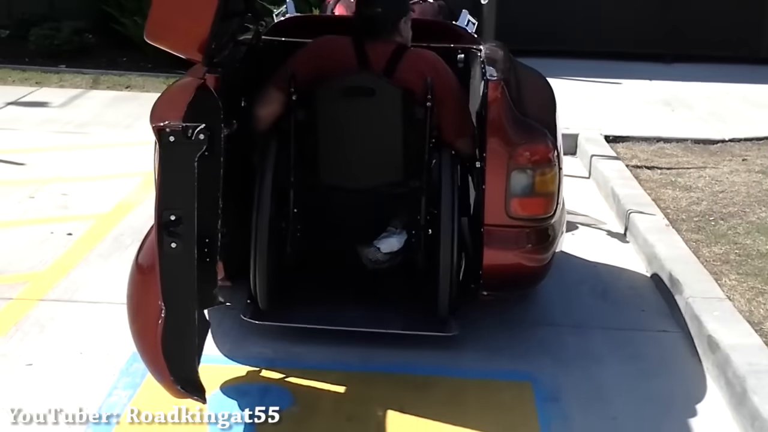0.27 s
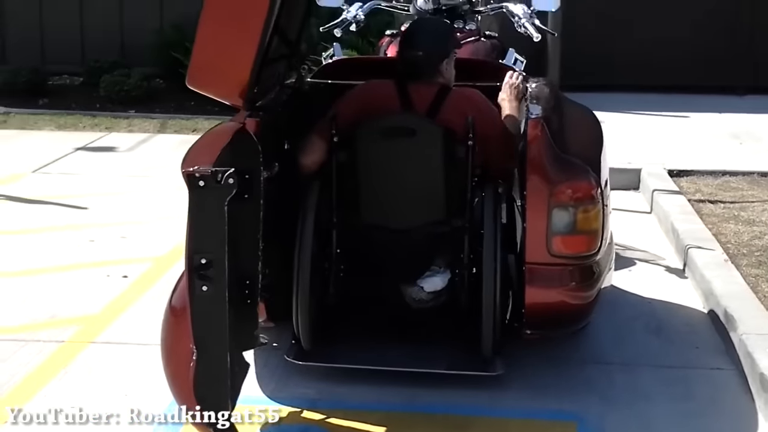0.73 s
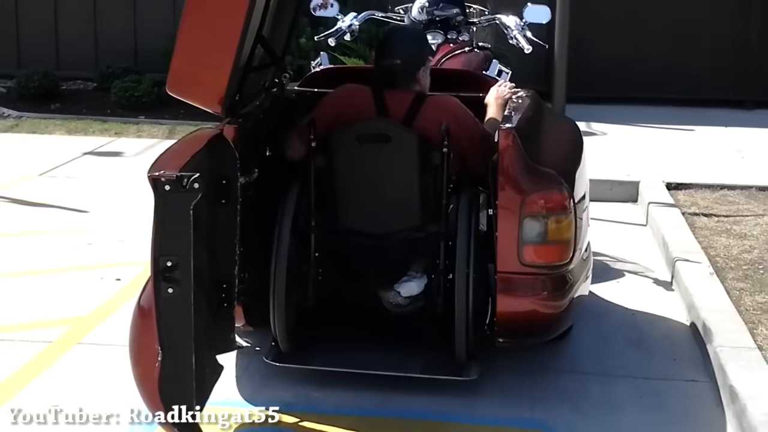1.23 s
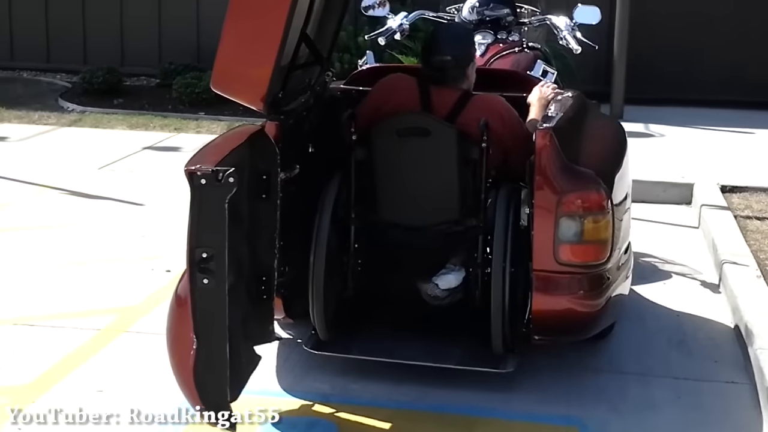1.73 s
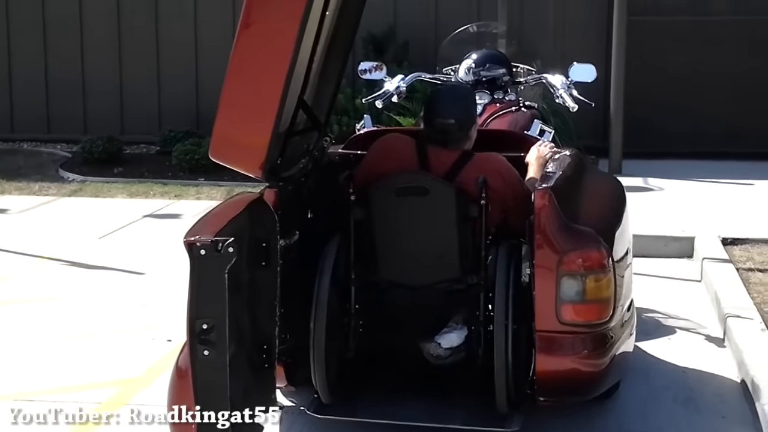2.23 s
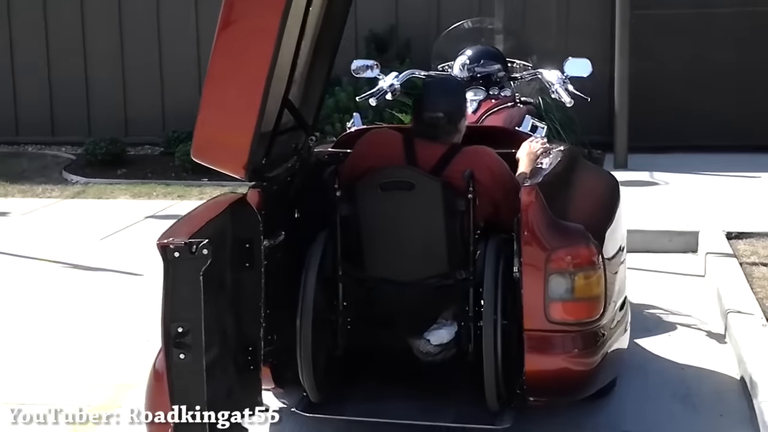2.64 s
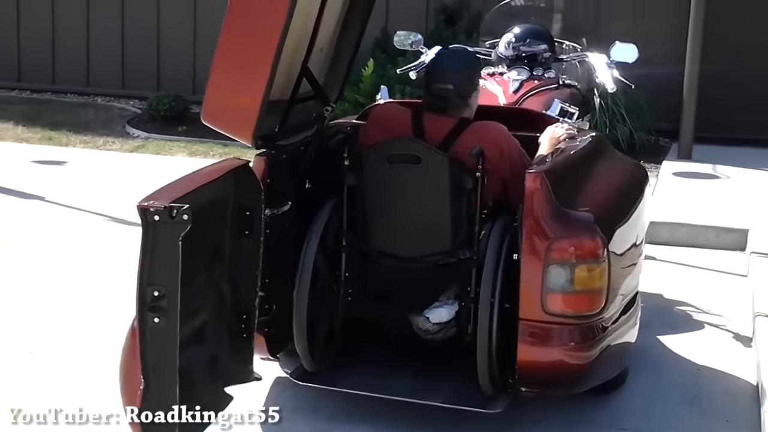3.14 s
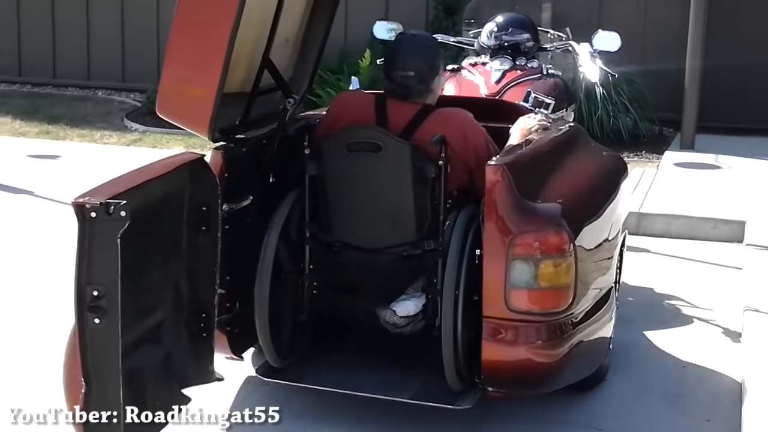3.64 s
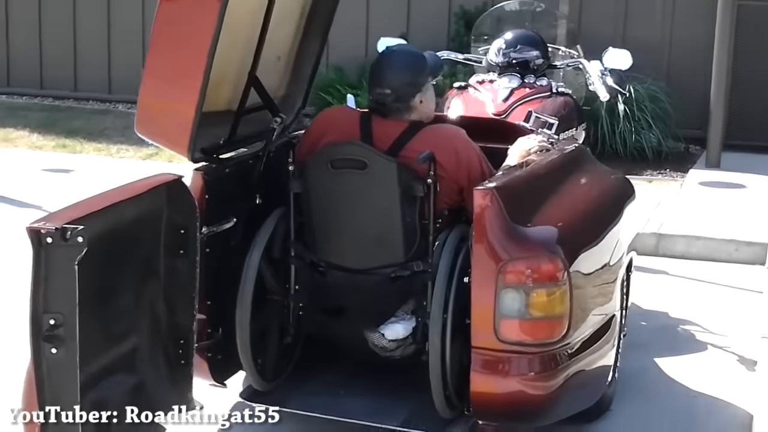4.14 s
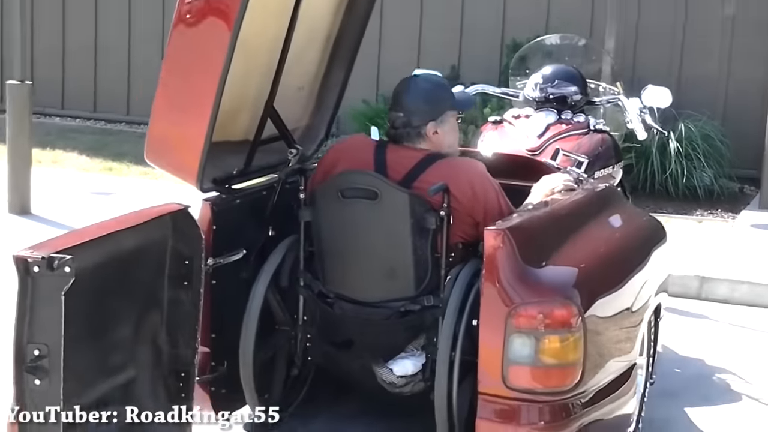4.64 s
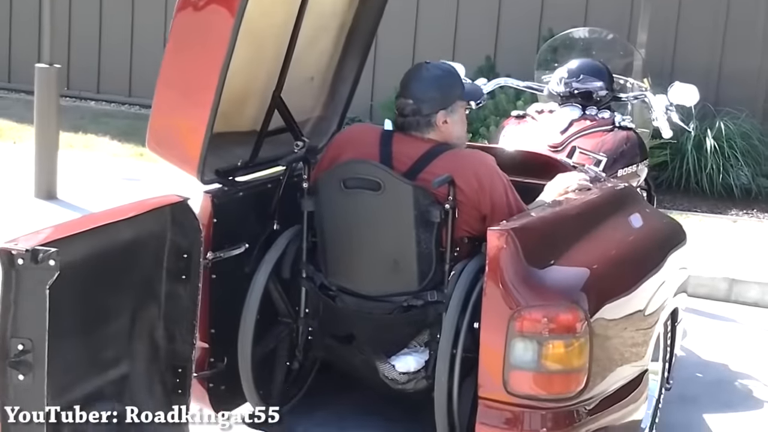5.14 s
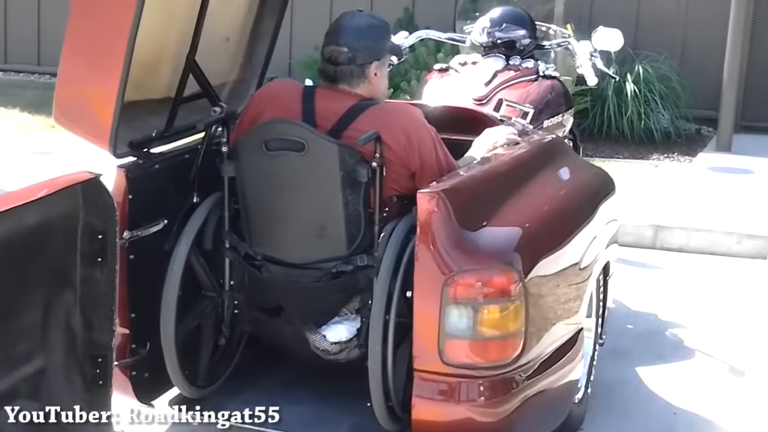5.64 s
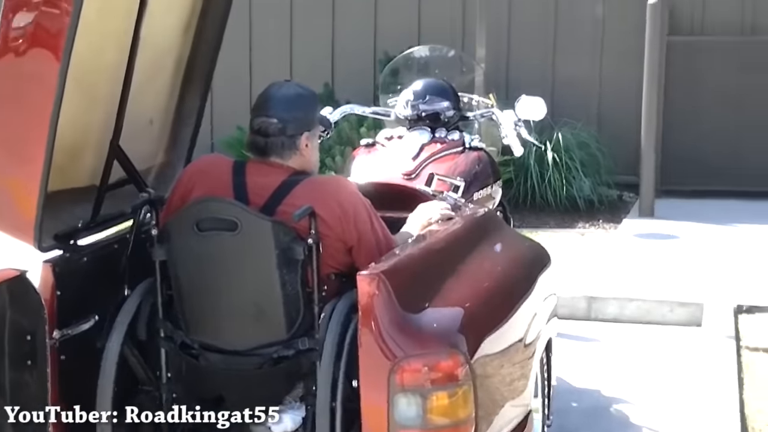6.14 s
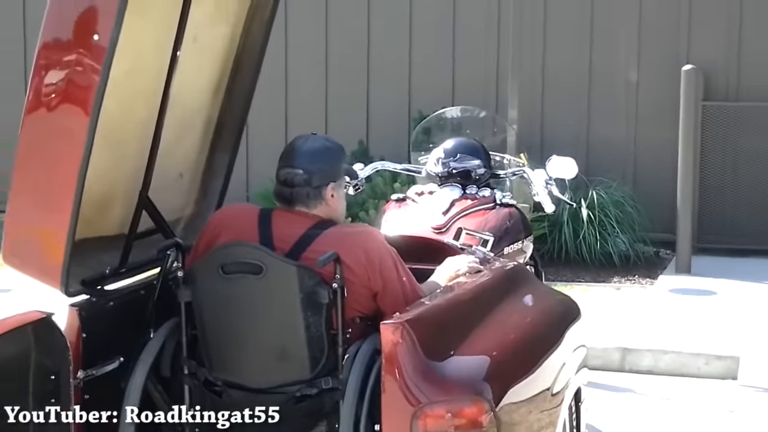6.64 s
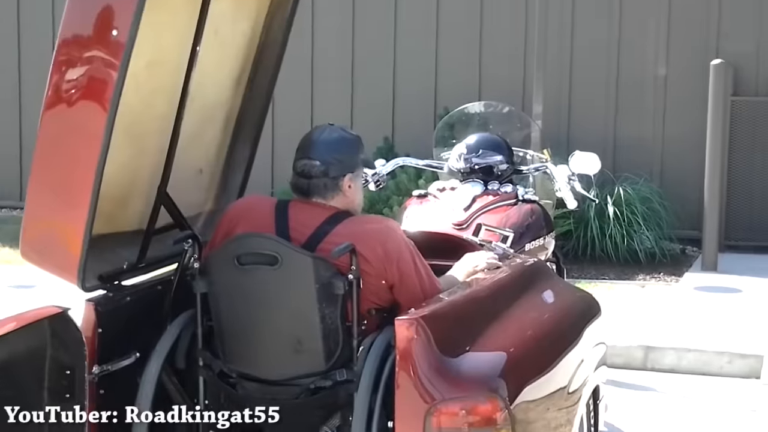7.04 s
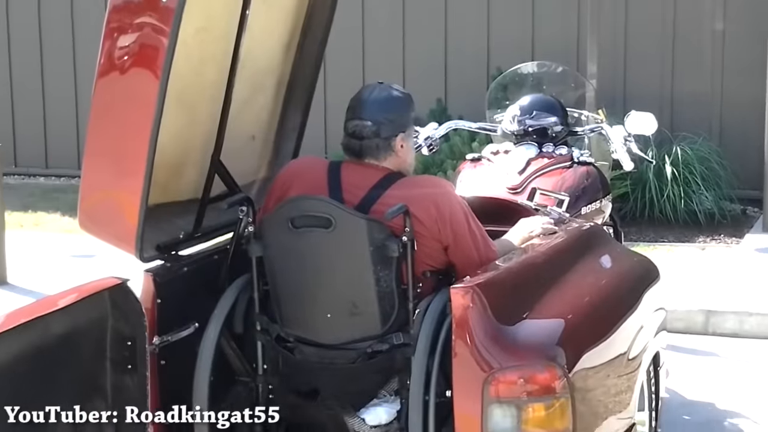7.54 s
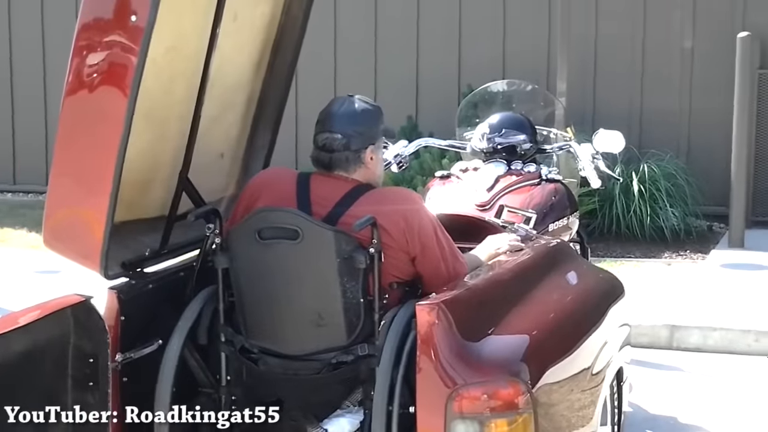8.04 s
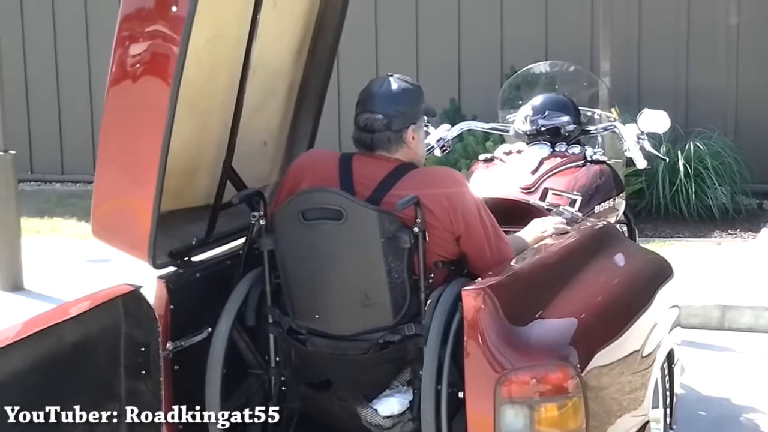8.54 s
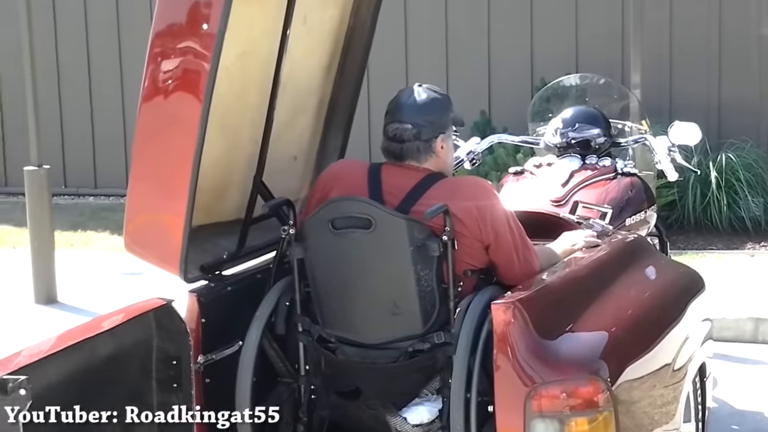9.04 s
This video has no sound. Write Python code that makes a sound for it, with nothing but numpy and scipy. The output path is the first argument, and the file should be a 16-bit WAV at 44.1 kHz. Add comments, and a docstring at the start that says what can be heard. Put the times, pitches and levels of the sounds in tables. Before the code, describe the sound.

Outdoors beside a parked motorcycle with a wheelchair sidecar, heard through a small handheld camera with little bass. At 0 s a short clank dies away; metal latch clicks follow at 0.2, 0.35 and 0.45, with a sharp, strongest one at 0.55 and a dull knock at 0.6. Thin, gliding bird whistles flutter over soft outdoor hum and a distant idling engine until about 1 s. At 0.95 the lift motor starts quickly with a brief growl, masking the background. Its rough, gritty whine near 210 Hz holds almost even, sagging slightly, with whirr, hiss and a rub pulsing about thirteen times a second. The sound grows nearer. Soft camera thumps occur at 1.7, 4.9 and 6.1-6.4; a mechanical jolt at 6.5, a sharp plastic tick at 7.27. Thumps and clicks cluster around 7.5-7.9, 8.4-8.9 and strongest at 9.15-9.25, the motor still running.

```python
"""Electric lift on a parked vehicle

The lift starts after about a second; a 16-tooth pinion sings a rough harmonic stack and rubs once a turn.
Sines on tooth-rate multiples make the whine, filtered noise and recurring grains the whirr, hiss and rub.
Before it: clicks of damped modes, gliding whistles of small birds, outdoor noise and an engine drone that
sink as it starts. More clicks come late; a hand-held camera walks closer, and fingers thump its body."""
import sys
import numpy as np
from scipy import signal
from scipy.fft import rfft, irfft
from scipy.io import wavfile
from scipy.ndimage import uniform_filter1d

SR = 44100
rng = np.random.default_rng(int(sys.argv[2]) if len(sys.argv) > 2 else 0)


def output_pcm(signal):
    """Save a mono or channel-first signal as 16-bit PCM at the path in sys.argv[1].

    Samples are clipped to [-1, 1] before scaling.
    """
    pcm = np.clip(np.atleast_2d(signal).T, -1, 1) * 32767
    wavfile.write(sys.argv[1], SR, np.round(pcm).astype(np.int16))


def undo_db(level):
    """Turn decibels back into plain size, where 20 dB means ten times bigger."""
    steps = np.asarray(level, float) / 20
    return 10 ** steps


N = 410126
T = np.arange(N) / SR


def level(x, db):
    """Scale to an rms level."""
    return x * undo_db(db) / np.sqrt(np.mean(x ** 2))


def coloured(points, source=None):
    """Noise, or another white source, shaped to a (f/Hz, level/dB) spectrum, rms 1."""
    hz, db = np.transpose(points)
    f = np.maximum(np.fft.rfftfreq(N, 1 / SR), 1)
    source = rng.standard_normal(N) if source is None else source
    gain = undo_db(np.interp(np.log(f), np.log(hz), db))
    return level(irfft(rfft(source) * gain, N), 0)


def resonant(modes, source=0):
    """Noise, plus any other source, through (f/Hz, width/Hz, level/dB) resonances, rms 1."""
    out = 0
    for hz, width_hz, db in modes:
        b, a = signal.iirpeak(hz, hz / width_hz, SR)
        once = signal.lfilter(b, a, source + rng.standard_normal(N))
        out = out + level(signal.lfilter(b, a, once), db)  # second pass steepens the skirts
    return level(out, 0)


def walk(rate_hz):
    """Random levels held 1 / rate and slewed twice; spread near 1."""
    k = int(SR / rate_hz)
    held = np.repeat(rng.standard_normal(N // k + 1), k)
    return 1.3 * uniform_filter1d(uniform_filter1d(held, k), k)[:N]


def lobe(db, s, lobe_db, width_s):
    """Level in dB of a part with a Gaussian rise or dip in time, as when walking past a directional source."""
    return db + lobe_db * np.exp(-((T - s) / width_s) ** 2)


def add(out, s, x):
    """Mix x in from time s."""
    i = max(int(s * SR), 0)
    out[i:i + len(x)] += x[:N - i]


START_S, RUN_UP_S = 0.95, 0.11
WHINE_DB, WHIRR_DB, HISS_DB = -32.5, -35, -35.5  # at nearness 0 dB, running free
WHINE_GROWTH, WHIRR_GROWTH = 1.52, 1.17  # dB per dB of nearness
FREE_TURNS_PER_S, LOAD_DB = 12.98, 2  # whine gain per turn/s that the load takes off
# camera walks up to the lift: t/s, nearness/dB
NEARER = [(1., 1), (2.7, 1), (3.4, 1.5), (5.1, 2.5), (6.4, 3), (7.5, 4), (8.5, 3), (8.9, 5), (9.15, 5.5),
          (9.3, 8.5)]
# gears take up the load at the start: t/s, width/s, whirr level/dB
GROWL = (1, 0.096, 3.6)


def lift():
    """Hum, whine, whirr, hiss and rub all hang on one shaft and swell once a turn."""
    speed, turn = shaft()
    teeth = tooth_phase(turn)
    swell = np.cos(2 * np.pi * (turn - .04))
    near_db = np.interp(T, *np.transpose(NEARER))
    jolt_db = jolts()
    running = np.clip((T - START_S) / RUN_UP_S, 0, 1) ** 0.75
    whine_db = WHINE_DB + WHINE_GROWTH * near_db + LOAD_DB * (FREE_TURNS_PER_S - speed) + .6 * jolt_db
    growl_s, growl_width_s, growl_db = GROWL
    whirr_db = WHIRR_DB + WHIRR_GROWTH * near_db + jolt_db + lobe(0, growl_s, growl_db, growl_width_s)
    hiss_db = HISS_DB + near_db + 1.18 * jolt_db
    gears = undo_db(whine_db + 2.0 * swell) * low_whine(teeth)
    gears += undo_db(whirr_db + 0.24 * swell) * whirr(turn, teeth)
    gears += undo_db(hiss_db) * (hiss(turn, teeth, swell) + rub(turn, jolt_db))
    return hum(turn, swell) + running * gears


# pinion shaft: t/s, speed/(turns/s)
SPEED = [(1.0, 13.996), (1.6, 13.829), (2.4, 13.864), (2.95, 13.147), (3.5, 13.194), (4.05, 12.958),
         (5.3, 13.318), (6.3, 13.289), (6.9, 13.062), (7.6, 13.102), (8.0, 12.788), (8.4, 12.98),
         (8.8, 12.97), (9.05, 13.2), (9.3, 13.26)]
START_TURN = .365


def shaft():
    """Speed in turns/s and its running integral in turns."""
    speed = np.interp(T, *np.transpose(SPEED))
    return speed, START_TURN + np.cumsum(speed) / SR


TEETH = 16


def tooth_phase(turn):
    """Play between the teeth shifts their timing, so higher multiples smear more."""
    return TEETH * turn + .013 * walk(45) + .005 * walk(260) + .025 * np.sin(2 * np.pi * turn)


# mechanism catches, everything but the hum swells: t/s, whirr level/dB, decay/s
JOLTS = [(6.5, 5, 0.07), (6.58, 2, 0.066), (7.635, 4, 0.059), (8.6, 3.5, 0.055), (8.875, 2.5, 0.051),
         (8.955, 3.5, 0.088), (9.225, 2, 0.016)]
JOLT_RISE_S = 0.021


def jolts():
    """Level in dB of swells with exponential rise and decay."""
    return sum(db * np.exp(np.where(T < s, (T - s) / JOLT_RISE_S, (s - T) / decay_s)) for s, db, decay_s in JOLTS)


HUM_DB = -38
SIDE_DB = -14  # over the hum


def hum(turn, swell):
    """Clean fundamental; the off-centre pinion adds a side line one turn rate below."""
    wave = np.sin(2 * np.pi * (TEETH * turn + 0.044 * walk(16)))
    side = np.sin(2 * np.pi * ((TEETH - 1) * turn + 0.07 * walk(6.6)))
    wave += undo_db(SIDE_DB + 4.1 * walk(1.6)) * side
    fade_in = np.clip((T - 1.01) / 0.011, 0, 1)
    return wave * np.sqrt(2) * undo_db(HUM_DB + 0.31 * swell + 0.22 * walk(7.6)) * fade_in


def whine(teeth, multiples, flicker_db=3.6):
    """Sines on multiples of the tooth rate, each flickering on its own, rms 1."""
    out = 0
    for k, db in multiples:
        wave = np.sin(2 * np.pi * (k * teeth + 0.17 * walk(35) + rng.random()))
        out = out + undo_db(db + flicker_db * walk(70) + 1.24 * walk(11) + walk(2.996)) * wave
    return level(out, 0)


# loud or dead direction of each: tooth-rate multiple, relative level/dB, faced at t/s, lobe level/dB
MULTIPLES = [(2, -20.5, 1.3, 12.5), (3, -5.5, 3.25, 4), (4, -8, 6.25, -16), (5, -10, 8.2, 4.5),
             (6, -10.5, 2.1, -6), (7, -11.5, 5.6, 5.5), (8, -23.5, 2.87, 19), (9, -13, 6, 7),
             (10, -13, 4.2, 2.5), (11, -14, 7.1, 0), (12, -16.5, 7.2, 3), (13, -12.5, 0.91, -19),
             (14, -24.5, 5.5, 13.5)]
# loudest on a side line: {multiple: offset/turn rates}
SIDE_SHIFT = {5: -1, 6: -2, 9: -1, 10: -1}
LOBE_S = 1  # time to walk out of a lobe


def low_whine(teeth):
    """Each multiple radiates in lobes, so its level changes along the walk."""
    lines = []
    for k, db, faced_s, lobe_db in MULTIPLES:
        shifted = k + SIDE_SHIFT.get(k, 0) / TEETH
        lines.append((shifted, lobe(db, faced_s, lobe_db, LOBE_S)))
    return whine(teeth, lines)


GRIT_DB = 4.5  # spread of the grain sizes


def grit(turn, count=3300):
    """Flaws on the tooth flanks: uneven grains that come round again every turn."""
    grains = rng.standard_normal(count) * undo_db(GRIT_DB * rng.standard_normal(count))
    return grains[(turn % 1 * count).astype(int)]


# whirr spectrum: f/Hz, level/(dB per Hz)
WHIRR = [(35, -67), (90, -37), (156, -13.5), (211, -7.5), (264, -11.5), (503, -7.5), (650, -3.5),
         (1220, -8.5), (1660, -11), (3500, -16.5), (4550, -54), (7700, -120)]
GRIND_DB = -2.5  # grit over the plain noise
# frame modes: f/Hz, width/Hz, relative level/dB
FRAME = [(571, 78, -5), (644.4, 22, -6.5), (796, 96, -3), (979, 31, -9.5), (1578, 160, -7),
         (1660.6, 45, -2.5), (2160, 70, -9)]
# frame directivity: level over plain whirr/dB, faced at t/s, lobe level/dB, width/s
FRAME_LOBE = (-14, 2.5, 16.5, 3)


def whirr(turn, teeth):
    """Plain noise, grit in the same colour, and frame resonances driven by grit."""
    grind = undo_db(GRIND_DB) * coloured(WHIRR, grit(teeth / TEETH))
    frame = undo_db(lobe(*FRAME_LOBE)) * resonant(FRAME, grit(turn))
    return coloured(WHIRR) + grind + frame


# hiss spectrum: f/Hz, level/(dB per Hz)
HISS = [(1300, -18), (2200, -8.5), (3200, -2.5), (5200, -3), (6300, -14.5), (8700, -29), (9600, -23),
        (11000, -100)]
CHATTER_DB = -2  # grit share of the hiss
# casing modes: f/Hz, width/Hz, relative level/dB
CASING = [(2515, 73, -8), (2857, 69, -7.5), (3190, 190, -10.5), (3833, 125, -0.5), (3980, 43, -4.5),
          (4386, 110, -8.5), (5120, 310, -7.5), (5586, 140, -7)]
# upper whine: tooth-rate multiple, relative level/dB
HIGH_MULTIPLES = [(15, 2.5), (16, 2.5), (17, 2), (18, 1), (19, -2), (21, -1.5), (24, -1), (27, -7)]


def hiss(turn, teeth, swell):
    """Noise, tooth chatter, casing resonances and the upper whine, swelling together."""
    out = undo_db(-3.5) * coloured(HISS)
    out += undo_db(CHATTER_DB) * coloured(HISS, grit(teeth / TEETH))
    out += undo_db(-3) * resonant(CASING, grit(turn))
    out += undo_db(-2.0) * whine(teeth, HIGH_MULTIPLES)
    return out * undo_db(1.3 * swell + walk(12))


# rub modes: f/Hz, width/Hz, relative level/dB
RUB = [(1920, 790, -2), (3740, 190, 1), (4586, 170, 2.5), (4990, 530, 4), (5330, 430, -1),
       (7000, 8800, -6.5)]
# grip of the tight spot: t/s, rub level over the hiss/dB
GRIP = [(1.2, 10.5), (1.7, 0), (2.1, 8), (2.8, 5.5), (3.3, 1), (4., 3.5), (4.5, 11), (5.2, 11), (5.6, 6),
        (7.2, 7), (7.9, 3.5), (8.4, 7), (9.05, 6.5), (9.3, -19)]


def rub(turn, jolt_db):
    """A tight spot rubs once a turn: quick rise, slower fall, uneven from turn to turn."""
    since_turns = (turn + .5 + 0.075) % 1 - .5
    uneven_db = 1.1 * rng.standard_normal(150)[(turn + .5 + .08).astype(int)]
    size_db = np.interp(T, *np.transpose(GRIP)) + .6 * jolt_db + uneven_db
    envelope = np.where(since_turns > 0, np.exp(-since_turns / .115), np.exp(since_turns / .035))
    return undo_db(size_db) * envelope * resonant(RUB, grit(turn))


MOTOR_TOP_HZ = 9000
# bodywork shades the middle range: t/s, width/s, f/Hz, width/Hz, share lost
SHADE = (8.74, .3, 1870, 760, 0.52)


def enclosed(motor):
    """Covers hold back the top; the bodywork briefly takes out part of a middle band."""
    covers = signal.ellip(6, 1, 70, MOTOR_TOP_HZ, fs=SR, output="sos")
    motor = signal.sosfilt(covers, motor)
    s, width_s, hz, width_hz, share = SHADE
    band = signal.lfilter(*signal.iirpeak(hz, hz / width_hz, SR), motor)
    return motor - share * lobe(0, s, 1, width_s) * band


# clicks of latch and linkage: t/s, level/dB, tilt/(dB/octave), ring length share
CLICKS = [(0.206, -14.5, -13, 1.3), (0.335, -16, 7, 0.67), (0.455, -27, -2, 0.55), (0.5522, -3.5, 3, 1.2),
          (6.491, -25.5, -2, 1.2), (7.628, -19, -3, 0.89), (8.868, -10, -6, 0.73), (8.9452, -12, 7, 0.84),
          (9.245, -11, 30, 0.7)]
# catch modes: f/Hz, relative level/dB, t60 at share 1/s
LATCH = [(2580, -17, .03), (3240, -8, .02), (4030, 0, .022), (4540, 1, .03), (4780, -8, .03),
         (5050, -8, .03), (5390, 1, .06), (6140, -21, .02), (8790, -28, .014)]
# first contact spectrum: f/Hz, level/(dB per Hz)
CRACK = [(800, -28), (1800, -21), (3700, 19), (5500, 9), (7000, -20), (14500, -37)]
CRACK_DB, RING_DB = -14, -14  # over click level: crack rms before decay; ring rms in its first 8 ms
CRACK_S, RATTLE_S = 0.007, 0.005  # decay times


def latch():
    """Each click is a noise crack and a few ms of rattle into the modes of a small metal catch."""
    out, t, crack = np.zeros(N), T[:SR // 2], coloured(CRACK)
    for s, db, tilt_db, share in CLICKS:
        ring = 0
        for hz, mode_db, t60_s in LATCH:
            gain = undo_db(mode_db + tilt_db * np.log2(hz / 4000))
            ring = ring + gain * np.sin(2 * np.pi * hz * t) * undo_db(-60 * t / (t60_s * max(share, .2)))
        rattle = rng.standard_normal(1200) * np.exp(-T[:1200] / RATTLE_S)
        x = signal.fftconvolve(ring, rattle)
        contact = crack[int(s * SR):][:1500] * np.exp(-t[:1500] / CRACK_S)
        add(out, s, undo_db(db + CRACK_DB) * contact)
        add(out, s, undo_db(db + RING_DB) * x / x[:350].std())
    return out


# blow dying away at the outset: level/dB, f/Hz, t60/s
CLANK = (-9.5, 1980, 0.082)


def clank():
    """One sine plus coloured noise under an exponential decay."""
    out, t = np.zeros(N), T[:SR // 2]
    db, hz, t60_s = CLANK
    noise = coloured([(100, -32), (400, -12.0), (2500, -7.5), (6000, -23.0), (9000, -36)])[:len(t)]
    add(out, 0, undo_db(db - 60 * t / t60_s) * (0.38 * np.sin(2 * np.pi * hz * t) + 0.45 * noise))
    return out


# dull knock from the vehicle floor: level/dB, t60/s
KNOCK = (-31, 0.4)
KNOCK_S = .6


def knock():
    """Dull coloured noise with a 12 ms rise and an exponential decay."""
    out, t = np.zeros(N), T[:SR // 2]
    db, t60_s = KNOCK
    noise = coloured([(100, -16), (350, -1), (1300, -6), (2600, -10), (4500, -22), (9000, -60)])[:len(t)]
    add(out, KNOCK_S, undo_db(db - 60 * t / t60_s) * noise * np.minimum(t / 0.012, 1))
    return out


# thumps on the camera body: t/s, level/dB, f/Hz
THUMPS = [(1.695, -17, 239), (4.935, -25, 131), (4.943, -18.5, 285), (6.116, -20, 260), (6.157, -16, 276),
          (6.374, -16.5, 250), (7.493, -15, 220), (7.509, -11, 245), (7.6, -7, 270), (7.795, -17.5, 249),
          (7.877, -15, 328), (8.434, -14, 293), (8.583, -7.5, 355), (8.612, -13, 396), (8.65, -11, 250),
          (8.683, -3, 267), (8.713, -11.5, 266), (8.864, -24, 800), (8.9, -22, 282), (9.145, -1, 390),
          (9.167, -13, 320), (9.2076, 0, 416), (9.2172, -5.5, 760), (9.248, -12, 348), (9.269, -13.5, 296)]


def thumps(cycles=0.68, ring_cycles=0.37):
    """Each is a cycle or two of the camera shell and a short rattle."""
    out, t = np.zeros(N), T[:2000]
    shell = resonant([(320, 800, 14.0), (730, 560, -11.0)])
    for s, db, hz in THUMPS:
        u = (t - .005) * hz  # cycles from the peak
        envelope = np.exp(-np.where(u < 0, (u / cycles) ** 2, u / ring_cycles))
        rattle = np.roll(shell, int(s * SR))[:len(t)] * undo_db(-15)
        rattle = rattle * np.exp(-np.abs(t - .005) / 0.018) * np.minimum(t / 0.012, 1)
        add(out, s, undo_db(db) * (envelope * np.sin(2 * np.pi * u + 0.83) + rattle))
    return out


# sharp plastic tick close to the microphone: t/s, level/dB
TICK = (7.2724, -2)


def tick():
    """Three sines that die within a few ms."""
    out, t = np.zeros(N), T[:2000]
    s, db = TICK
    x = np.sin(2 * np.pi * 11800 * t) * np.exp(-t / .0005)
    x += .6 * np.sin(2 * np.pi * 5300 * t) * np.exp(-t / .0009)
    x += 1.5 * np.sin(2 * np.pi * 8200 * t) * np.exp(-t / 0.00023)
    add(out, s, undo_db(db) * x * np.minimum(t / 0.0003, 1))
    return out


# hand shifting on the shell: f/Hz, level/(dB per Hz)
RUMBLE = [(25, -8), (45, -14), (90, -7.5), (150, -4), (250, -22)]
# its course: t/s, level/dB
RUMBLE_DB = [(.8, -50.5), (1.3, -57.5), (2.5, -59.5), (2.9, -70), (4.3, -71), (4.6, -59), (7., -67),
             (8., -53.5), (9.3, -57)]


def rumble():
    """Low noise that comes and goes."""
    return undo_db(np.interp(T, *np.transpose(RUMBLE_DB)) + 4.1 * walk(8.9)) * coloured(RUMBLE)


# bird notes: start t/s, length/s, from f/Hz, to f/Hz, level before flutter/dB
BIRDS = [(.21, .07, 5300, 5260, -46), (.268, .025, 4900, 4400, -42), (.345, .2, 5330, 5210, -44.5),
         (0.486, .045, 4800, 4550, -40), (.648, .022, 6000, 4800, -40), (0.706, .015, 7500, 6000, -45),
         (.72, .022, 3950, 4750, -38), (.74, .014, 5000, 3900, -38), (.77, .085, 5880, 5900, -45),
         (.843, .009, 6200, 4900, -36), (.846, .018, 4050, 4800, -37), (.856, .022, 5300, 4050, -36),
         (.96, .022, 4150, 4400, -38), (.982, .014, 4500, 3300, -40)]


def birds():
    """Thin gliding whistles with an unsteady pitch and flutter, blurred by near echoes."""
    out, waver_hz = np.zeros(N), 220 * walk(500)
    for s, length_s, from_hz, to_hz, db in BIRDS:
        n = int(length_s * SR)
        steadiness = min(.02 / length_s, 1) ** 2  # long notes waver less
        hz = np.linspace(from_hz, to_hz, n) + waver_hz[int(s * SR):][:n] * steadiness
        add(out, s, undo_db(db) * np.sin(2 * np.pi * np.cumsum(hz) / SR) * np.hanning(n) ** 0.43)
    echoes = rng.standard_normal(1200) * np.exp(-T[:1200] / .007)
    echoes[0] = 8  # direct sound
    fluttering = out * undo_db(2.5 + 1.5 * walk(150))
    return signal.fftconvolve(fluttering, echoes / np.linalg.norm(echoes))[:N]


# distant idling engine: multiple of the firing rate, level/dB
DRONE = [(8, -53), (9, -49), (13, -49), (20, -47.5), (22, -53), (23.13, -51), (30, -54)]
DRONE_HZ = 36.06  # firing rate


def engine():
    """Sines on the clearest multiples of a slightly unsteady firing rate."""
    firing = DRONE_HZ * T + .004 * walk(8)
    out = 0
    for k, db in DRONE:
        wave = np.sqrt(2) * np.sin(2 * np.pi * (k * firing + rng.random()))
        out = out + undo_db(db + 1.3 * walk(7.6)) * wave
    return out


# outdoor hum spectrum: f/Hz, level/(dB per Hz)
OUTDOOR = [(30, -40), (60, -35), (240, -2.5), (480, -5.5), (750, -6.5), (1300, -11), (2000, -15),
           (2900, -21), (4300, -14.5), (5600, -14.5), (6700, -29), (9000, -40), (14500, -43)]
OUTDOOR_DB = -37.5


def outdoor():
    """Steady coloured noise with a slight drift in level."""
    return undo_db(OUTDOOR_DB + 0.16 * walk(2.6)) * coloured(OUTDOOR)


BACKGROUND_SINKS_DB = -10


def background():
    """Engine and outdoor hum drop as the lift starts."""
    sinks = undo_db(BACKGROUND_SINKS_DB * np.clip((T - START_S) / RUN_UP_S, 0, 1))
    return sinks * (outdoor() + engine())


def scene():
    """Everything reaches one microphone."""
    metal = latch() + clank() + knock()
    handling = thumps() + tick() + rumble()
    return (enclosed(lift()) + metal + handling + birds() + background())[None]


def low_pass(x):
    """Removes everything above the highest recorded frequency."""
    return signal.sosfilt(signal.butter(12, 14610, fs=SR, output="sos"), x)


def record(dry):
    """The small microphone loses the bass: third-order high-pass at 85 Hz."""
    thin = signal.sosfilt(signal.butter(3, 85, "high", fs=SR, output="sos"), dry)
    return low_pass(thin)


dry = scene()
out = record(dry)
output_pcm(out)
```